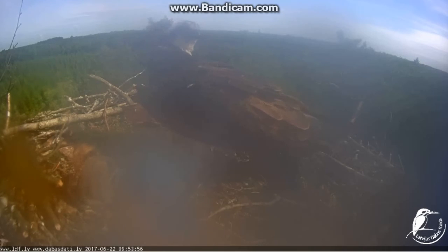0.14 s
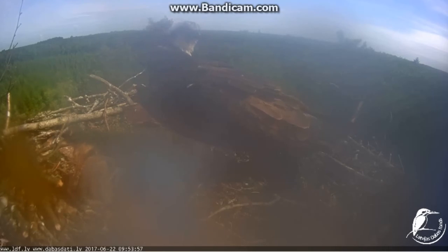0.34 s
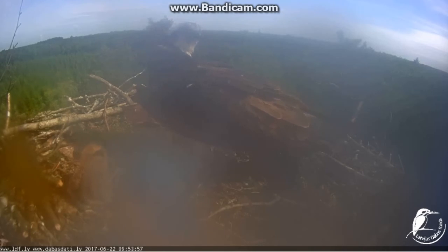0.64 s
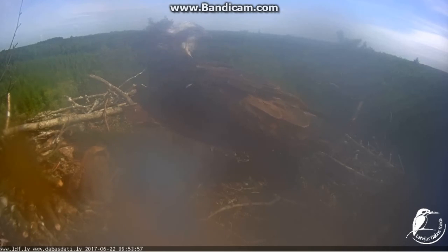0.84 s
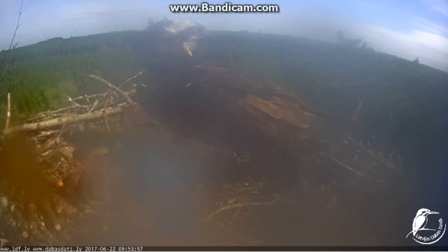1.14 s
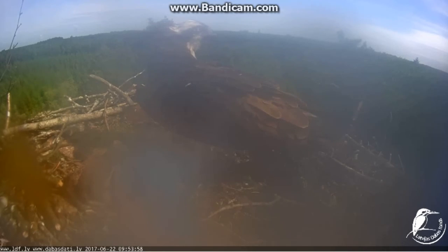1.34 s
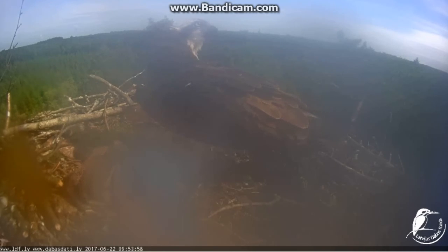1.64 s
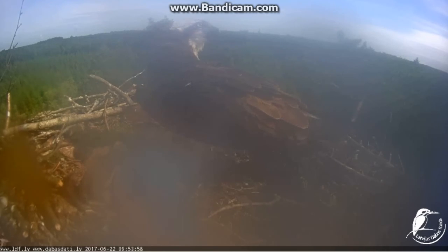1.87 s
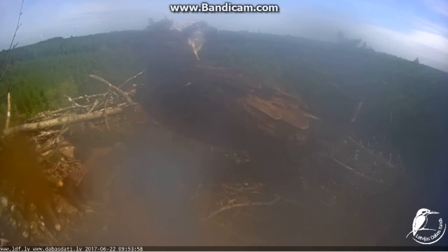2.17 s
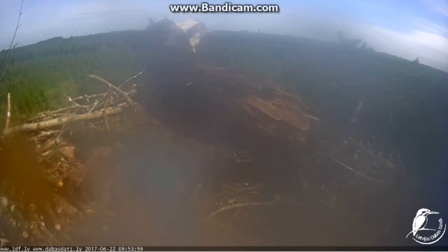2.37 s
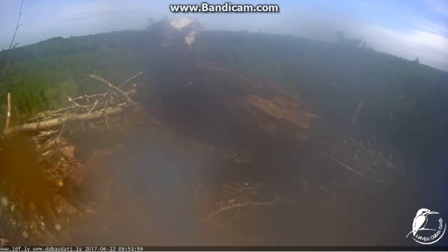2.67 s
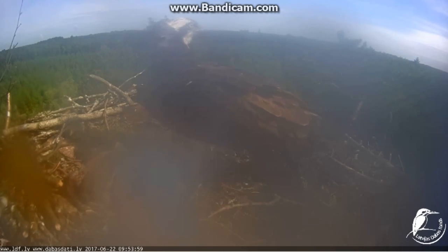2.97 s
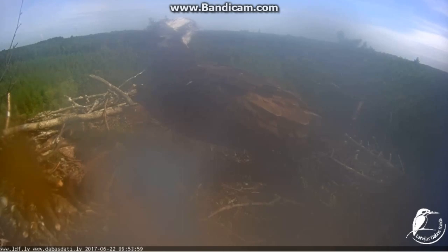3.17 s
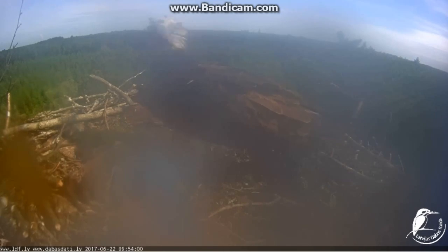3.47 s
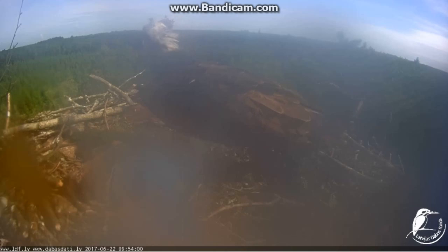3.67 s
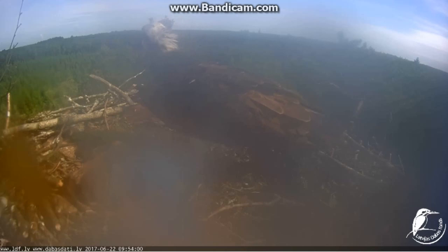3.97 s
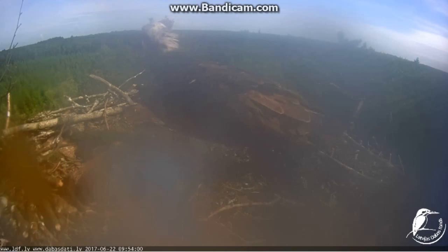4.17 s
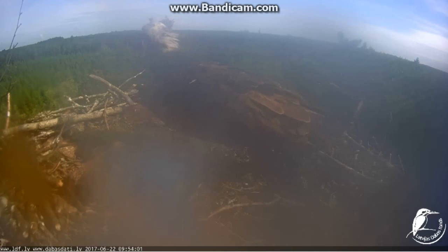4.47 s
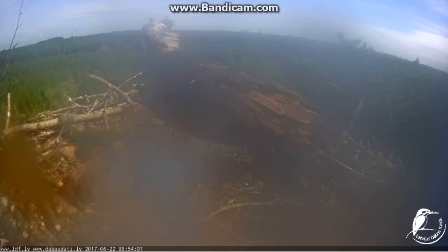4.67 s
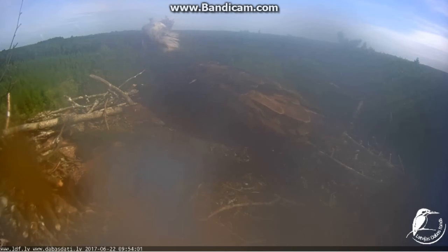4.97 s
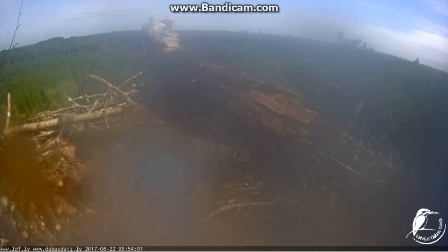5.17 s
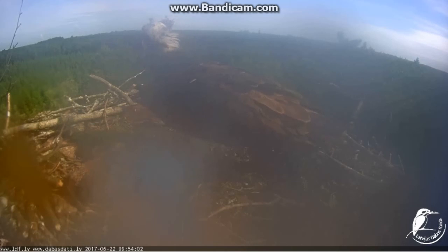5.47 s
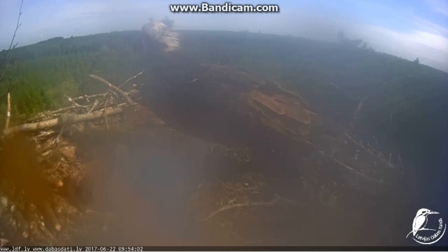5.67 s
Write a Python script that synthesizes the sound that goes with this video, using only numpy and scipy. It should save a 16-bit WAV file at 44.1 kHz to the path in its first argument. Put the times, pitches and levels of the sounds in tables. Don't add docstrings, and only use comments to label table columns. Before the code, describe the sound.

A quiet, hissy open-air microphone high in a forest picks up wind as a low soft roar with sub-bass bumps. Faint distant birds give steep falling notes, evenly repeated chips, brief whistles and a pulsed rasp, then busy hoarse twittering through the middle. The calls thin out to isolated pips in the last second or so. Light woodland echo blurs the notes.

```python
import sys
import numpy as np
from scipy import signal
from scipy.fft import rfft, irfft
from scipy.io import wavfile

SR = 44100
rng = np.random.default_rng(int(sys.argv[2]) if len(sys.argv) > 2 else 0)


def decibels_to_gain(level_db):
    exponent = np.asarray(level_db, float) / 20
    return 10 ** exponent


def pcm_store(signal):
    levels = np.round(np.clip(np.atleast_2d(signal), -1, 1) * 32767)
    wavfile.write(sys.argv[1], SR, levels.astype(np.int16).T)


N = 256201

# f/Hz, density/(dB per Hz)
ROAR_SPECTRUM = [(18, -44), (30, 8), (43, 1.5), (70, 2.5), (149, -3.5), (207, -6), (425, -12.5), (562, -13),
                 (767, -17), (1500, -28), (1950, -54), (3300, -120)]
ROAR_DB = -49.5
SWELL_DEPTH, SWELL_HZ = .14, 10

# f/Hz, density/(dB per Hz)
HISS_SPECTRUM = [(880, -17.5), (1500, -9.5), (1730, -5.5), (2210, 1), (2430, -1), (2640, -3.5), (3100, -7),
                 (3610, -8), (4190, -9.5), (6060, -12), (7320, -15), (8590, -16.5), (11500, -17.5),
                 (12800, -19), (14300, -24)]
HISS_DB = -57.5
# f/Hz, density/(dB per Hz)
HISS_EDGE = [(14100, -20), (15150, -36), (15300, -60)]

# t/s, level/dB
GUSTS = [(0.0, -55), (0.14, -68), (0.23, -43), (1.03, -41), (1.42, -34.5), (1.6, -50.5), (1.9, -36),
         (1.95, -50), (2.02, -44.5), (2.44, -42.5), (2.49, -50), (2.86, -43), (2.89, -35.5), (3.25, -54),
         (3.34, -32.5), (3.54, -40.5), (5.72, -58.5), (5.8, -48)]
# f/Hz, density/(dB per Hz)
BUFFET_SPECTRUM = [(3, -45), (8, 2.5), (13, -3.5), (18, -4), (26, -15.5), (45, -25), (70, -120)]
# t/s, length/s, level/dB
MOANS = [
    (0.502, .12, -60.5),
    (1.975, 0.13, -63),
    (2.87, 0.24, -61.5),
    (3.91, 1.08, -57.5),
]
MOAN_HZ, MOAN_WIDTH_HZ = 286, 142

# start t/s, end t/s, lowest f/Hz, highest f/Hz, level/dB
FLOCK = [
    (.3, 1.5, 2600, 3600, -72),
    (1.8, 3.1, 3600, 6800, -74),
    (2.5, 4.25, 2600, 4600, -72),
]
FLOCK_PER_S, FLOCK_NOTE_S, FLOCK_FALL = 22, .022, .15

FOREST_T60_S, FOREST_DB, DIRECT_DB = .45, -6.5, -.7

# length/s, start f/Hz, middle f/Hz, end f/Hz
SLIDE_SHAPE = (.056, 5550, 4080, 2700)
UP_SHAPE = (.015, 2950, 3300, 3640)
DOWN_SHAPE = (.014, 3500, 3180, 2950)
PIP_SHAPE = (.06, 3530, 3620, 3660)
# t/s, level/dB
SLIDES = [
    (.085, -63),
    (.238, -64),
    (.395, -61),
    (.555, -62),
]
# t/s, level/dB
CHIPS = [
    (.812, -59.5),
    (.932, -60.5),
    (1.048, -59.5),
    (1.168, -60),
    (1.113, -66),
    (1.231, -65),
]
CHIP_GAP_S = .022
# t/s, level/dB
PIPS = [
    (.607, -65),
    (2.367, -64),
    (3.125, -67.5),
    (4.03, -65.5),
    (4.955, -70),
    (5.745, -68),
]
# t/s, length/s, start f/Hz, end f/Hz, level/dB
RISES = [(.91, .035, 2250, 2750, -61.5), (1.382, .025, 2500, 2750, -63), (1.552, .05, 2180, 2470, -59),
         (1.942, .03, 3800, 4250, -62.5), (2.11, .05, 2200, 2420, -62), (2.215, .065, 2130, 2460, -58),
         (2.35, .05, 1900, 2500, -63), (2.487, .03, 2550, 2700, -60.5), (2.663, .03, 6100, 6450, -67),
         (2.958, .11, 2290, 2460, -55.5), (3.988, .016, 2950, 3500, -60), (4.162, .03, 3000, 3500, -62),
         (4.36, .03, 2500, 3540, -58.5), (5.333, .015, 2300, 2550, -59.5)]
# t/s, length/s, start f/Hz, end f/Hz, level/dB
FALLS = [(1.283, .03, 3050, 2800, -61), (1.315, .025, 2650, 2450, -57), (1.339, .033, 2450, 1700, -56.5),
         (1.46, .025, 2400, 2100, -58), (1.897, .045, 6050, 3750, -65), (2.017, .035, 6200, 5700, -70),
         (2.23, .06, 6800, 5850, -72), (2.276, .042, 2460, 2230, -57.5), (2.682, .035, 7000, 5300, -66),
         (2.859, .032, 6900, 5500, -64), (2.89, .03, 2300, 2050, -58), (2.95, .036, 6600, 4900, -62.5),
         (2.65, .014, 7000, 6500, -65), (3.052, .03, 6200, 5000, -68), (3.233, .02, 2750, 2350, -59.5),
         (3.415, .025, 3550, 2700, -62.5), (3.532, .12, 2290, 1780, -56), (3.554, .07, 4190, 3900, -60),
         (3.617, .047, 4000, 2200, -58.5), (4.025, .016, 3600, 2600, -59.5), (4.205, .016, 3700, 2900, -64),
         (4.387, .044, 3520, 1950, -57.5)]
# t/s, length/s, f/Hz, level/dB
HOLDS = [(.21, .05, 2770, -66), (.54, .035, 2820, -63), (1.415, .045, 2470, -62), (1.49, .07, 3520, -67),
         (1.57, .04, 3320, -66), (2.173, .045, 2030, -62.5), (2.225, .035, 3830, -63.5),
         (2.708, .012, 5450, -64), (2.843, .014, 5450, -59.5), (2.91, .025, 5450, -67),
         (2.87, .02, 4420, -65), (3.033, .15, 4420, -70), (3.162, .035, 5400, -66), (3.22, .04, 5420, -64),
         (3.252, .027, 2350, -58), (3.455, .065, 4290, -66.5), (3.832, .065, 4250, -68),
         (3.942, .02, 2950, -60), (4.12, .03, 2600, -57.5)]
RISE_SHARE, FALL_SHARE = .8, .42
FLUTTER = .3

# t/s, length/s, f/Hz, level/dB
BURRS = [(1.866, 0.087, 5840, -62), (2.28, 0.035, 2050, -58), (2.626, .09, 6870, -69),
         (2.215, .025, 2050, -57), (2.862, .04, 3920, -62), (3.21, 0.11, 3980, -62),
         (3.337, 0.094, 4030, -66), (3.622, 0.091, 4020, -60), (3.771, 0.042, 2260, -57),
         (4.2, .04, 4280, -65), (4.22, 0.11, 2300, -60), (4.4, 0.14, 2920, -61)]
# t/s, length/s, middle f/Hz, level/dB
CHATTER = [(1.37, 0.074, 2700, -65), (1.99, 0.1, 4100, -65), (2.215, 0.024, 4300, -60),
           (2.27, .05, 3950, -66), (2.98, 0.17, 4730, -68), (3.3, .2, 3340, -65.5), (2.53, .066, 6270, -71),
           (2.779, .08, 6300, -69), (3.161, .032, 4660, -62), (3.186, 0.1, 4330, -62.5),
           (3.538, .11, 4610, -63.5), (3.66, 0.061, 3260, -63), (3.729, 0.089, 2700, -59),
           (3.83, .05, 3420, -57.5), (3.942, .041, 2460, -55), (4.11, 0.11, 2500, -57),
           (4.187, 0.072, 3550, -59.5), (4.28, .02, 4690, -61), (4.415, .05, 2350, -55),
           (4.59, .16, 2340, -60.5)]
BURR_SPREAD_HZ, CHATTER_SPREAD_HZ, SAG_HZ_PER_S = 220, 520, 2500

# t/s, length/s, centre f/Hz, swing/Hz, repeat rate/Hz, level/dB
RASP = (1.478, .098, 4650, 620, 171, -53.5)
RASP_SAG_HZ = 300
# t/s, length/s, centre f/Hz, swing/Hz, repeat rate/Hz, level/dB
WARBLE = (4.428, .165, 2270, 270, 58.5, -54.5)

# low f/Hz, high f/Hz
LOWER_BAND = (6190, 6760)
UPPER_BAND = (6880, 7450)
# t/s, length/s
LOWER_GAPS = [(1.495, .025), (1.548, .029), (3.25, .022), (3.563, .022), (4.045, .024)]
# t/s, length/s
UPPER_GAPS = [(1.52, .025), (1.93, .022), (3.15, .025), (3.225, 0.065), (3.633, .022), (5.58, .022)]
DROPOUT_DB = -28
TOP_HZ, TOP_LOSS, TOP_DB = 14250, .2, -12
OFFSET = .0172


def evened(x):
    return x / np.sqrt(np.mean(x ** 2) + 1e-20)


def add(mix, s, sound):
    part = mix[round(s * SR):][:len(sound)]
    part += sound[:len(part)]


def coloured(points):
    f, density_db = np.transpose(points)
    hz = np.fft.rfftfreq(N, 1 / SR)
    gain = decibels_to_gain(np.interp(np.log(hz + 1), np.log(f + 1), density_db, left=-120))
    return evened(irfft(rfft(rng.standard_normal(N)) * gain, N))


def wobble(samples, width_hz):
    noise = rng.standard_normal((2, samples))
    r = np.exp(-np.pi * width_hz / SR)
    smooth = signal.lfilter([1], [1, -2 * r, r * r], noise[0] + 1j * noise[1])
    return smooth / np.sqrt(np.mean(abs(smooth) ** 2))


def voiced(envelope, hz):
    phase = 2 * np.pi * np.cumsum(hz) / SR
    return evened((envelope * np.exp(1j * phase)).real)


def rumble():
    roar = coloured(ROAR_SPECTRUM)
    swell = abs(1 + SWELL_DEPTH * wobble(N, SWELL_HZ))
    return decibels_to_gain(ROAR_DB) * roar * swell


def hiss():
    return decibels_to_gain(HISS_DB) * coloured(HISS_SPECTRUM[:-2] + HISS_EDGE)


def wind():
    t = np.arange(N) / SR
    buffeting = decibels_to_gain(np.interp(t, *np.transpose(GUSTS))) * coloured(BUFFET_SPECTRUM)
    moan = voiced(wobble(N, MOAN_WIDTH_HZ), np.full(N, MOAN_HZ))
    swell = np.zeros(N)
    for s, length, level_db in MOANS:
        add(swell, s, decibels_to_gain(level_db) * signal.windows.tukey(round(length * SR), .4))
    return buffeting + swell * moan


def flock():
    out = np.zeros(N)
    for start, end, low_hz, high_hz, level_db in FLOCK:
        count = round(FLOCK_PER_S * (end - start))
        for when, pitch, fall, long in rng.random((40, 4))[:count]:
            hz = low_hz * (high_hz / low_hz) ** pitch
            end_hz = hz * (1 - FLOCK_FALL * fall)
            note = glide(FLOCK_NOTE_S * (.5 + long), hz, end_hz, level_db)
            add(out, start + when * (end - start), note)
    return out


def forest(x):
    t = np.arange(SR // 2) / SR
    tail = rng.standard_normal(len(t)) * decibels_to_gain(-60 * t / FOREST_T60_S)
    tail *= t > .008
    return signal.fftconvolve(x, tail / np.linalg.norm(tail))[:N]


def whistle(length, start_hz, middle_hz, end_hz, level_db):
    u = np.linspace(-1, 1, round(length * SR))
    bend_hz = (start_hz + end_hz) / 2 - middle_hz
    hz = middle_hz + (end_hz - start_hz) / 2 * u + bend_hz * u ** 2
    air = 1 + FLUTTER * middle_hz / 2800 * wobble(SR // 4, 170)[-len(u):]
    return decibels_to_gain(level_db) * voiced(air, hz) * signal.windows.tukey(len(u), .25)


def glide(length, start_hz, end_hz, level_db):
    share = RISE_SHARE if end_hz > start_hz else FALL_SHARE
    return whistle(length, start_hz, start_hz + share * (end_hz - start_hz), end_hz, level_db)


def buzz(length, start_hz, end_hz, spread_hz, level_db):
    hz = np.linspace(start_hz, end_hz, round(length * SR))
    shake = wobble(SR // 2, 1.46 * spread_hz)[-len(hz):]
    return decibels_to_gain(level_db) * voiced(shake, hz) * signal.windows.tukey(len(hz), .3)


def rasp(length, centre_hz, swing_hz, rate, level_db):
    u = np.linspace(0, 1, round(length * SR))
    turn = u * length * rate % 1
    hz = centre_hz - RASP_SAG_HZ * np.sin(np.pi * u) + swing_hz * (2 * turn - 1)
    puff = np.sin(np.pi * np.sqrt(turn))
    hoarse = 1 + 1.3 * FLUTTER * wobble(SR // 2, 250)[-len(u):]
    return decibels_to_gain(level_db - 7 * u) * voiced(puff * hoarse, hz) * signal.windows.tukey(len(u), .3)


def warble(length, centre_hz, swing_hz, rate, level_db):
    swing = np.cos(2 * np.pi * rate * np.arange(round(length * SR)) / SR)
    hoarse = 1 + 2 * FLUTTER * wobble(SR // 2, 250)[-len(swing):]
    tone = voiced(hoarse, centre_hz + swing_hz * swing)
    return decibels_to_gain(level_db) * tone * signal.windows.tukey(len(swing), .3)


def songbirds():
    out = np.zeros(N)
    for shape, delay, rows in ((SLIDE_SHAPE, 0, SLIDES), (UP_SHAPE, 0, CHIPS),
                               (DOWN_SHAPE, CHIP_GAP_S, CHIPS), (PIP_SHAPE, 0, PIPS)):
        for s, level_db in rows:
            add(out, s + delay, whistle(*shape, level_db))
    for s, *note in RISES + FALLS:
        add(out, s, glide(*note))
    for s, length, hz, level_db in HOLDS:
        add(out, s, glide(length, hz, hz, level_db))
    for s, length, hz, level_db in BURRS:
        add(out, s, buzz(length, hz, hz, BURR_SPREAD_HZ, level_db))
    for s, length, hz, level_db in CHATTER:
        half_sag = SAG_HZ_PER_S * length / 2
        add(out, s, buzz(length, hz + half_sag, hz - half_sag, CHATTER_SPREAD_HZ, level_db))
    add(out, RASP[0], rasp(*RASP[1:]))
    add(out, WARBLE[0], warble(*WARBLE[1:]))
    return out


def scene():
    air = wind() + rumble() + hiss()
    birds = songbirds() + flock()
    return (air + decibels_to_gain(DIRECT_DB) * birds + decibels_to_gain(FOREST_DB) * forest(birds))[None]


def band_gaps(x):
    hz, t, z = signal.stft(x, SR, nperseg=512, noverlap=384)
    keep = np.ones(z.shape[1:])
    for (low_hz, high_hz), rows in ((LOWER_BAND, LOWER_GAPS), (UPPER_BAND, UPPER_GAPS)):
        band = (hz > low_hz) & (hz < high_hz)
        for s, length in rows:
            keep[np.ix_(band, (t > s) & (t < s + length))] = decibels_to_gain(DROPOUT_DB)
    lost = np.repeat(rng.random(len(t) // 8 + 1) < TOP_LOSS, 8)[:len(t)]
    keep[np.ix_(hz > TOP_HZ, lost)] = decibels_to_gain(TOP_DB)
    return signal.istft(z * keep, SR, nperseg=512, noverlap=384)[1][:, :N]


def band_limit(x):
    return signal.sosfilt(signal.butter(12, 15010, fs=SR, output="sos"), x)


def record(dry):
    mix = band_gaps(dry) + OFFSET
    return band_limit(mix)


dry = scene()
out = record(dry)
pcm_store(out)
```